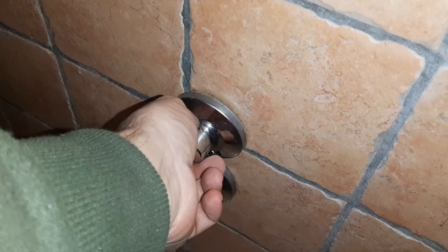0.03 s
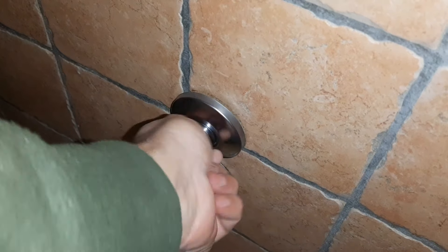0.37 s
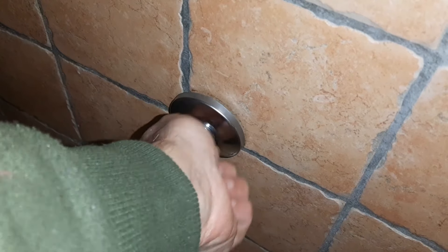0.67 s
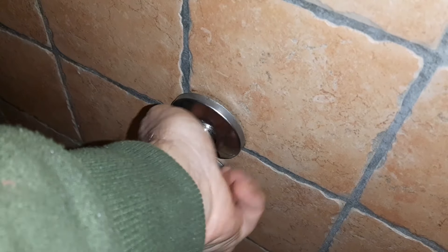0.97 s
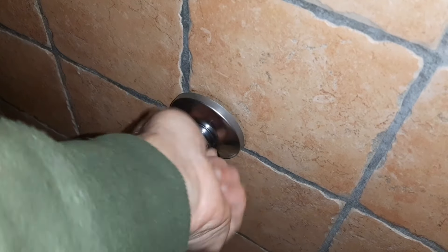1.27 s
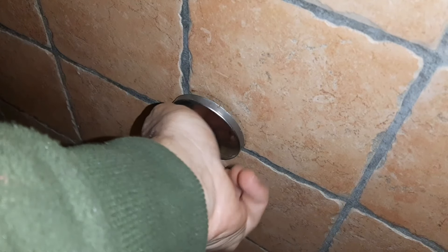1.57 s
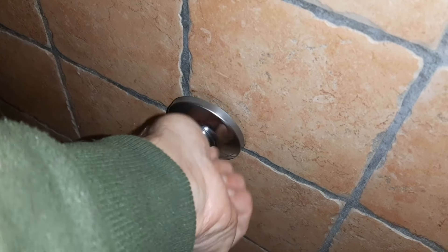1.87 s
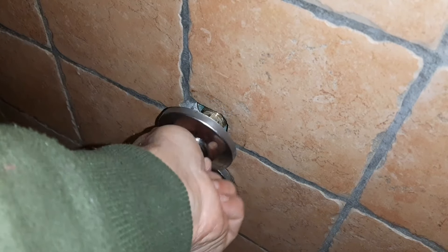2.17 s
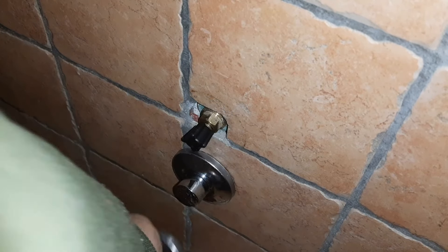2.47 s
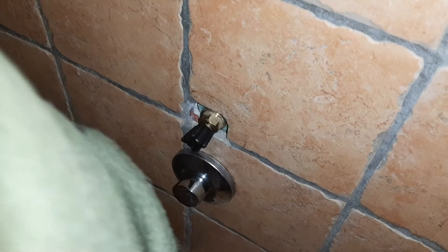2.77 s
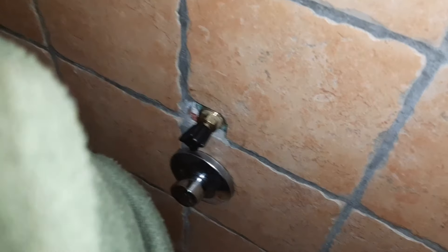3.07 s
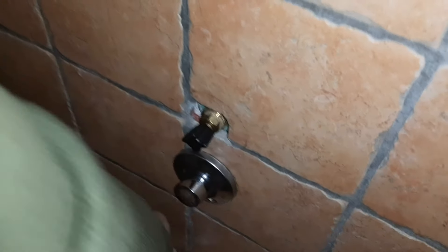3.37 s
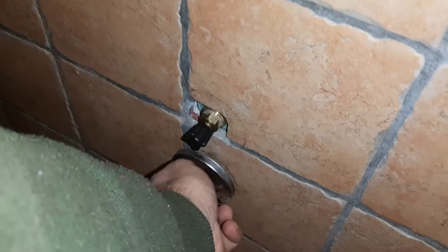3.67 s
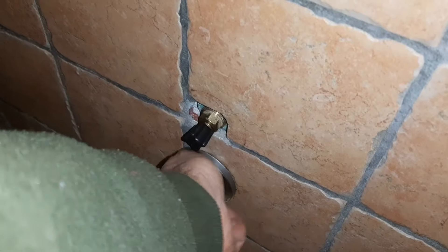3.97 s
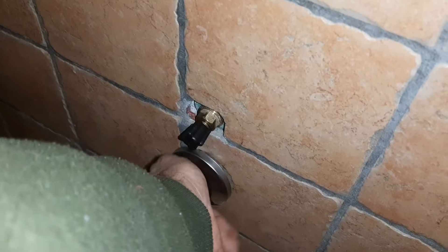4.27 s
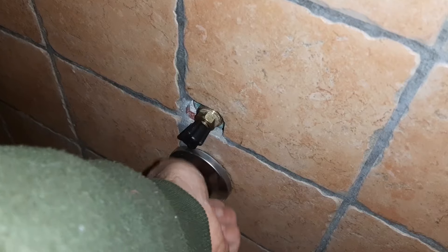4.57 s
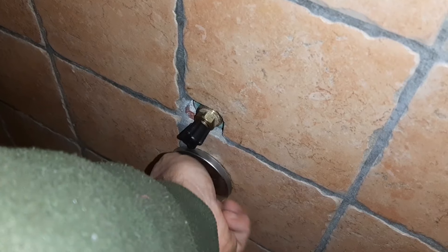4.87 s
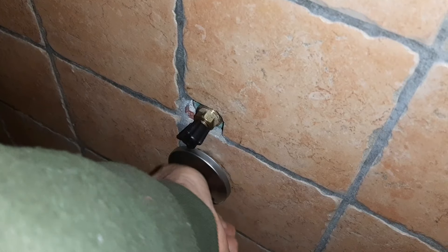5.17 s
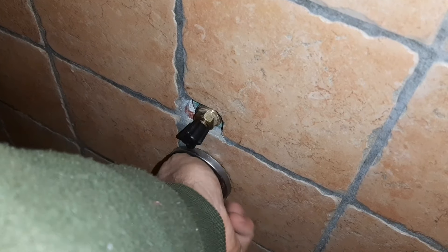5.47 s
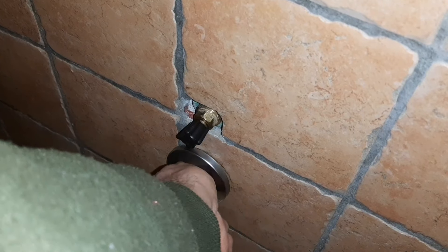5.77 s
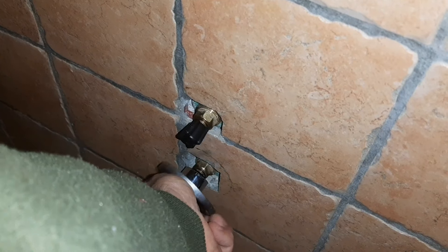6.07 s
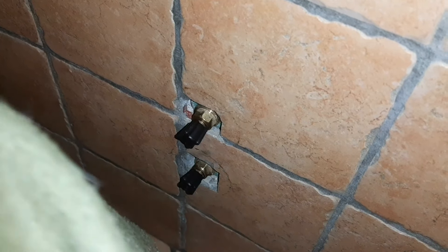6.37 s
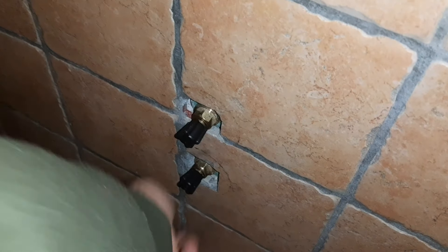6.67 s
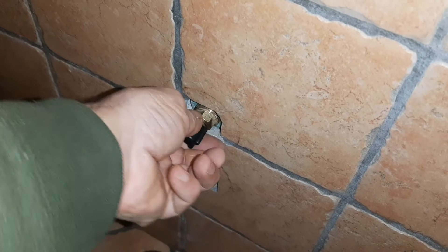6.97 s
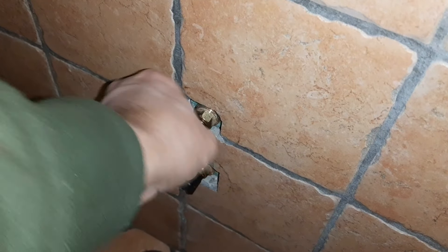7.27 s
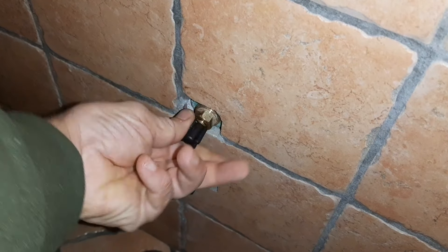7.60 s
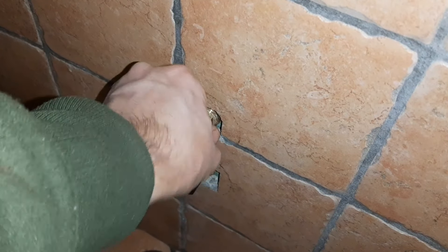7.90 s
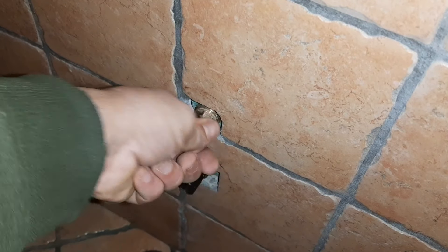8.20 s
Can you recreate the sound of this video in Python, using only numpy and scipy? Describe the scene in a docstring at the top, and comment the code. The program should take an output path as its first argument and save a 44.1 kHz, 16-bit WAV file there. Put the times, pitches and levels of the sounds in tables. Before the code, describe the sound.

Metal valve covers are unscrewed by hand in a tiled bathroom, squeaking and scraping, then set down with a clank and a clatter.

```python
"""A small tiled bathroom, a two-port stereo microphone close to the wall, slightly right of the work.
Two chrome valve covers are unscrewed by hand: their threads stick and slip, ringing the thin metal
and knocking the pipe in the wall. The first squeaks, comes off and is set down with a clank; the
second grinds, rings and lands with a bright clatter. A sleeve rustles, fingers tap the bare valve,
and the tiles answer over faint hiss and house hum."""
import sys
import numpy as np
from scipy import signal
from scipy.fft import rfft, irfft, next_fast_len
from scipy.io import wavfile
from scipy.ndimage import uniform_filter1d, map_coordinates

SR = 44100
rng = np.random.default_rng(int(sys.argv[2]) if len(sys.argv) > 2 else 0)


def log_audio(samples):
    """Write samples as a 16-bit WAV file to the path given in sys.argv[1]."""
    # one column per channel
    frames = np.atleast_2d(samples).T
    # limit to full scale, then quantise
    limited = np.clip(frames, -1, 1)
    pcm = np.round(limited * 32767).astype(np.int16)
    wavfile.write(sys.argv[1], SR, pcm)


N = 372204

# Levels in the tables are relative: each source adds its own gain.
# twists of each cover: start/s, end/s, effort/dB
UPPER_TWISTS = [(0.41, 0.5, -51), (0.56, 0.67, -47.5), (0.84, 0.92, -55.5), (1.045, 1.095, -47.5),
                (1.24, 1.33, -51), (1.48, 1.545, -45.5), (1.65, 1.765, -55.5), (1.87, 1.96, -48),
                (2.065, 2.17, -45), (2.245, 2.3, -45)]
LOWER_TWISTS = [(3.55, 3.602, -45), (3.744, 3.867, -46), (3.998, 4.064, -47), (4.184, 4.295, -41.5),
                (4.373, 4.476, -41.5), (4.509, 4.62, -44.5), (4.747, 4.826, -47), (4.935, 5.064, -43),
                (5.124, 5.174, -40.5), (5.237, 5.434, -45), (5.504, 5.79, -43.5), (5.882, 5.992, -30.5),
                (6.086, 6.117, -41.5), (6.188, 6.205, -31.5)]
# a cover catches on its thread or is nudged in the hand: t/s, level/dB
UPPER_CATCHES = [(0.4896, -27), (0.641, -27), (0.6953, -19), (1.0844, -32), (1.493, -12.5), (1.538, -38),
                 (1.587, -34.5), (1.6632, -38), (1.703, -21.5), (1.749, -27.5), (1.81, -45), (1.872, -33),
                 (1.896, -36), (1.9481, -22.5), (2.0747, -19.5), (2.1031, -21.5), (2.1374, -15)]
LOWER_CATCHES = [(3.5789, -22), (3.7242, -29.5), (4.2005, -18.5), (4.3395, -16), (4.3779, -14.5),
                 (4.442, -26), (4.749, -31), (4.974, -18.5), (5.019, -27.5), (5.1412, -19.5),
                 (5.242, -25.5), (5.2792, -18.5), (5.3245, -26.5), (5.4865, -10), (5.665, -27),
                 (5.7184, -30), (5.7798, -22.5), (5.854, -14), (6.1883, -31.5)]
# resonances of each cover: f/Hz, width/Hz, level held/dB, level let go/dB
UPPER_RESONANCES = [(5160, 50, 3, 1.5), (5340, 70, 7, -5), (5560, 120, 8, -17), (11400, 120, -14, -16),
                    (12140, 130, -4, -7), (13450, 110, -8, -12)]
LOWER_RESONANCES = [(5150, 80, -12, -14), (5700, 70, -3, -14), (6430, 65, 3, 2.5), (6640, 70, -6, -8),
                    (7040, 60, -5, -13), (8620, 70, -20, -27), (10380, 55, -5, -9), (10850, 70, -6, -8),
                    (11250, 90, -2, -9), (12140, 65, -13, -8), (13280, 70, -13, -17), (13650, 80, -9, -14),
                    (14550, 90, -20, -15)]
# the rims slip: t/s, level/dB, half length/s, f/Hz, glide either side of f/octaves
RIM_SLIPS = [(0.385, -40.5, 0.015, 2610, .07), (0.4265, -14.5, 0.0069, 2581, .08),
             (0.592, -42, 0.04, 4190, 0.008), (0.872, -24, 0.0045, 2086, 0.2),
             (0.889, -32, 0.0062, 2490, 0.1), (1.058, -31, 0.0055, 2046, 0.16),
             (1.2615, -16.5, 0.0053, 2382, 0.1), (1.309, -32, 0.0087, 1702, 0.19),
             (1.504, -21, 0.012, 2426, 0.54), (4.039, -28.5, 0.0044, 2114, 0.13),
             (4.341, -31, 0.0026, 1800, .15), (5.388, -31.5, 0.0073, 5270, 0.023),
             (5.618, -26, 0.0025, 5280, 0.02), (6.182, -36.5, 0.0064, 1550, 0.04),
             (6.857, -13.5, 0.0049, 6370, .01), (6.87, -10, 0.0057, 6410, .01)]
# low squeaks carry more overtone and grit: f/Hz, level/dB
SQUEAK_BRIGHTNESS = [(2400, -3), (4300, -32.5)]
# low squeaks are rough, high ones steadier: f/Hz, pitch waver/share
SQUEAK_WAVER = [(2400, .065), (4200, .022)]
# upper cover resonances that rubbing and squeaks excite: f/Hz, width/Hz, level/dB
SQUEAK_MODES = [(5520, 150, 5), (12200, 450, -10.5)]
# the upper cover is set down and rocks: t/s, level/dB, hollow note f/Hz
ROCKING = [(3.2839, -4.5, 1590), (3.2912, -7.5, 1520), (3.3223, -7.5, 1434), (3.3457, -17, 1300),
           (3.3553, -22, 1250), (3.391, -23, 1130), (3.4338, -26, 940), (3.5184, -24.5, 1310),
           (3.543, -33.5, 1312), (3.585, -34.5, 1170), (3.611, -37, 1240)]
# the lower cover lands and rebounds: t/s, level/dB, chatter hold/s, extra treble/dB, floor knock/dB
BOUNCES = [(6.624, -7.5, 0.01, 0.5, -17.5), (6.64, -3, .012, -4.5, -11.5), (6.655, -5, .016, -3, -16.5),
           (6.676, -4.5, 0.006, -6.5, -13.5), (6.696, -9.5, .008, -5, -14), (6.737, -16, .016, 0, -27.5),
           (6.812, -11, 0.0055, -3.5, -21), (6.851, -13, 0.0017, 3, -45.5), (6.8754, -3, .001, 7, -23),
           (6.89, -18, .003, -0.5, -44), (6.907, -14, .004, 1, -48), (6.9427, -15, 0.0039, 0, -44.5),
           (6.988, -16, 0.0052, 2.5, -33.5), (7.026, -8.5, 0.019, 4.5, -33), (7.065, -15, 0.02, 2.5, -58)]
# long ring of the lower cover, on its thread and lying free: f/Hz, level/dB, t60/s
HELD_RING = [(2228, -3.5, 0.25), (3882, -5, 0.3), (5470, -4, .2), (7040, -6, .2)]
FREE_RING = [(2236, -53, 1.8), (3885, -59, 5.0), (3890, -20, .45), (3958, -22, .25)]
# the lower cover sings under a lighter grip: start/s, end/s, low modes/dB, high modes/dB
RING_SWELLS = [(3.815, 3.94, -50, -51.5), (4.23, 4.343, -51, -40.5), (4.436, 4.513, -46.5, -43.5),
               (5.03, 5.1, -47, -51), (5.166, 5.272, -63, -43.5), (5.286, 5.326, -40, -44),
               (5.425, 5.49, -47.5, -46), (5.653, 5.73, -35.5, -40), (5.801, 5.863, -40.5, -41.5),
               (6.0, 6.066, -45.5, -52), (6.2, 6.268, -48.5, -58)]
# hollow bumps, and a low puff of air on the microphone as the cover lands: t/s, level/dB, f/Hz, t60/s
BUMPS_AND_PUFF = [(2.139, -25, 681, 0.12), (2.262, -29.5, 643, 0.13), (3.44, -17, 324, 0.11),
                  (3.441, -26.5, 138, 0.15), (3.453, -26, 193, 0.14), (3.485, -21.5, 275, 0.13),
                  (5.856, -34, 364, 0.12), (6.632, -13.5, 83.44, 0.082), (6.637, -15.5, 334, 0.084),
                  (6.634, -7, 1570, 0.03), (6.7, -11.5, 1400, 0.034)]
# the hand holds a cover: start/s, end/s, pipe rumble/dB
HAND_GRIPS = [(0.42, 2.18, -53), (3.5, 3.8, -54.5), (4.3, 5.45, -54), (5.6, 5.87, -50)]
# hollow resonances of the pipe in the wall: f/Hz, width/Hz, level/dB
PIPE_RESONANCES = [(357, 43, 7.5), (792, 65, 5.5), (1133, 39, -1.5)]
# the pipe knocks as a cover jerks, is grabbed or comes off: t/s, level/dB
PIPE_JOLTS = [(1.497, -34.5), (2.136, -35.5), (5.852, -25), (6.184, -34.5)]
# fingers tap the valve; the loose cover shifts in the hand: t/s, level/dB
FINGER_TAPS = [(7.3687, -50), (7.7715, -51), (8.2381, -53.5)]
HANDLING_TICKS = [(3.0946, -23.5), (3.125, -31.5), (3.153, -36.5), (3.1791, -29.5)]
# the arm sweeps past the microphone: start/s, end/s, level/dB
ARM_SWEEPS = [(0.55, 1.02, -53), (1.05, 1.5, -58.5), (2.22, 2.42, -55.5), (2.49, 2.76, -46.5),
              (2.86, 3.13, -55), (3.4, 3.65, -61), (6.29, 6.5, -51)]
# broad spectra of the sounding bodies and of the room's hiss: f/Hz, level/dB
UPPER_TONE = [(590, -29), (1000, -24.5), (1140, -6.5), (2150, 2.5), (4680, -0.5), (5310, 10), (8450, -14),
              (12100, -21), (16000, -27.5)]
LOWER_TONE = [(590, -52.5), (1000, -20), (2250, 3.5), (2840, -2), (5970, -8), (6470, 6), (8260, -30.5),
              (12700, -32.5), (16000, -46)]
SKITTER_TONE = [(880, -35.5), (1500, -25), (3380, -10), (3840, -6), (4830, -7.5), (6700, 0), (7920, -15.5),
                (9650, -21.5), (11100, -7), (16000, -23)]
PIPE_TONE = [(71, -59), (120, -15.5), (357, 0), (496, -5.5), (779, -9), (957, -21), (1400, -27),
             (1820, -30), (3080, -120)]
KNOCK_TONE = [(120, -43), (200, -10), (333, -4.5), (779, -3), (843, -4), (1360, -1.5), (2090, 1),
              (3000, -7), (3900, -26.5), (6600, -120)]
FLOOR_TONE = [(150, -54.5), (250, -23.5), (389, -14.5), (683, -14), (861, -12), (962, -9), (1430, -1.5),
              (2250, -15.5), (2750, -21.5), (3500, -31), (4550, -54.5), (7700, -91)]
HAND_TONE = [(150, -5.5), (1000, -1), (3000, -4.5), (5000, -3), (8000, -12.5), (16000, -19)]
TICK_TONE = [(150, -58.5), (250, -6.5), (647, 7), (2350, -1.5), (2860, -13), (3170, -44.5), (4000, -30),
             (6500, -120)]
SOFT_TONE = [(71, -36), (120, -6.5), (493, -7), (1460, -12), (4140, -7.5), (8310, -20), (16000, -23)]
HISS_TONE = [(15, -57.5), (25, -28.5), (102, -17), (242, -17.5), (754, -24), (3080, -31), (3820, -22.5),
             (4250, -23.5), (16000, -27.5)]
# spectrum of the house hum: f/Hz, level/dB
HUM_TONE = [(25, -32.5), (45, -20), (75, -6.5), (115, -3.0), (180, -16.0), (500, -58.0)]
# decay of the bathroom: f/Hz, t60/s
ROOM_DECAY = [(150, 1), (1200, 0.45), (5000, 0.37), (14000, 0.22)]
# the right port behind the left, for close sounds and for the bumps and puff: f/Hz, lag/rad
RIGHT_LAG = [(100, .1), (1000, 0.3), (3000, 1.6), (6000, 1.37), (15000, 2.4)]
THUD_LAG = [(100, 1.62), (350, 2.3), (700, 1.06)]

UPPER_LOOSE_S, LOWER_LOOSE_S = 1.82, 5.87  # from here on each cover sits loose on its thread
UPPER_OFF_S, UPPER_OFF_DB = 2.137, -22.5  # the upper cover jumps off with a bright tick
SPLIT_HZ = 4600  # between a cover's low and high resonances
SQUEAK_ROOM_DB = -6  # share of the squeaks that spills into the room
GRIP_EDGE_S = 0.17  # how fast a grip sets in


def upper_cover():
    """The first cover rasps off its thread, damped by the hand, and is set down with a clank."""
    held = body(UPPER_TONE, cover_modes(UPPER_RESONANCES, held=True), broad_db=-7)
    pipe = body(KNOCK_TONE, PIPE_RESONANCES, broad_db=-14.5)
    scrape = turning(UPPER_TWISTS, held, pipe, slips(350, 2.0, 0.86), UPPER_LOOSE_S, rasp_db=4.0,
                     grit_db=-7, knock_db=-9.5, loose_rasp_db=-11, loose_knock_db=11.5, edge=0.0009)
    scrape += contacts(UPPER_CATCHES, held, strike_db=-3.0, knock_db=-20.5, knock_grows=0.56,
                       t60=0.024, knock_t60=0.029, rise=0.00016)
    rub = strokes(UPPER_TWISTS, edge=0.0057) * slips(600, 3, 0.69)
    scrape += amp(-10) * through(rub, body(UPPER_TONE, SQUEAK_MODES, broad_db=-27))
    add(scrape, UPPER_OFF_S, amp(UPPER_OFF_DB) * blow(body(SKITTER_TONE), t60=0.082, rise=0.00035))
    return grip_bend(scrape) + set_down()


def lower_cover():
    """The second cover grinds off with a thin whistle and a swelling ring, then lands and skitters."""
    held = body(LOWER_TONE, cover_modes(LOWER_RESONANCES, held=True), broad_db=-6.0)
    pipe = body(PIPE_TONE, PIPE_RESONANCES, broad_db=3.0)
    scrape = turning(LOWER_TWISTS, held, pipe, slips(300, 2.5, 0.35), LOWER_LOOSE_S, rasp_db=-5.5,
                     grit_db=-2.5, knock_db=-8, loose_rasp_db=-12, loose_knock_db=-16.5, edge=0.008)
    scrape += contacts(LOWER_CATCHES, held, strike_db=-3.0, knock_db=-38.5, knock_grows=0.22,
                       t60=0.052, knock_t60=0.065, rise=0.0018)
    whistles = tiny_squeaks(LOWER_TWISTS, db=4.5, hz=6420, octaves=0.03, half_s=0.0043, per_second=50)
    tight_twists = [row for row in LOWER_TWISTS if row[0] < LOWER_LOOSE_S]
    grit = tiny_squeaks(tight_twists, db=7.5, hz=2730, octaves=0.36, half_s=0.0011, per_second=70)
    held_ring = amp(-22) * through(scrape, unit_energy(shell(HELD_RING)))
    free_ring = np.zeros(N)
    add(free_ring, BOUNCES[0][0] + 0.031, shell(FREE_RING))  # rings once the rim lifts clear
    return grip_bend(scrape) + whistles + grit + landings() + free_ring + swelling_ring() + held_ring


def turning(twists, metal, pipe, force, loose_s, rasp_db, grit_db, knock_db,
            loose_rasp_db, loose_knock_db, edge):
    """Each twist rubs the thread, sounding the cover and knocking the pipe; a loose cover rasps less."""
    rub = force * strokes(twists, edge) * amp(4.5 * wobble(60))  # the grip tightens and eases
    loose = np.arange(N) / SR > loose_s
    low = through(metal, signal.firwin(63, SPLIT_HZ, fs=SR))
    high = through(metal, signal.firwin(63, SPLIT_HZ, fs=SR, pass_zero=False))
    rasp = through(rub * amp(rasp_db + loose_rasp_db * loose), unit_energy(low))
    grit = through(rub * amp(grit_db), unit_energy(high))
    knock = through(rub * amp(knock_db + loose_knock_db * loose), pipe)
    return rasp + grit + knock


def contacts(rows, struck, strike_db, knock_db, knock_grows, t60, knock_t60, rise):
    """Contacts sound a body and knock the wall; the knock grows less, so hard ones are brighter."""
    track, wall = np.zeros(N), body(KNOCK_TONE)
    hardest = max(db for s, db in rows)
    for s, db in rows:
        add(track, s, amp(db + strike_db) * blow(struck, t60, rise))
        add(track, s, amp(knock_db + knock_grows * (db - hardest)) * blow(wall, knock_t60, rise))
    return track


def squeaks():
    """The rim slips: brief fluttering chirps that fall in pitch and shake the metal."""
    track, t = np.zeros(N), np.arange(-SR // 10, SR // 10) / SR
    metal = body(UPPER_TONE, SQUEAK_MODES, broad_db=-26)
    for s, db, half_s, hz, fall in RIM_SLIPS:
        flutter = unit_rms(uniform_filter1d(rng.standard_normal(len(t)), size=60))
        waver = unit_rms(uniform_filter1d(rng.standard_normal(len(t)), size=60))
        pitch_hz = hz * 2 ** (-fall * np.tanh(t / half_s)) * (1 + along(SQUEAK_WAVER, hz) * waver)
        phase = 2 * np.pi * np.cumsum(pitch_hz) / SR
        swell = amp(db) * (1 + 0.22 * flutter) / np.cosh(t / half_s) ** 2
        grit = 2 * amp(-10) * through(swell * rng.standard_normal(len(t)), metal)
        overtone = 0.41 * swell * np.sin(2 * phase)
        bright = amp(along(SQUEAK_BRIGHTNESS, hz)) * (overtone + grit)
        add(track, s + t[0], swell * np.sin(phase) + bright)
    return track


def tiny_squeaks(twists, db, hz, octaves, half_s, per_second):
    """Brief whistles or gritty chirps scattered through each twist, louder with more effort."""
    track, t = np.zeros(N), np.arange(-SR // 25, SR // 25) / SR
    for (start, end, effort_db), draws in zip(twists, rng.standard_normal((len(twists), 40, 4))):
        count = int(np.clip(round((end - start) * per_second), 1, len(draws)))
        for k, (late, detune, glide, strength) in enumerate(draws[:count]):
            pitch_hz = hz * 2 ** (octaves * (detune + 0.513 * glide * np.tanh(t / half_s)))
            swell = amp(effort_db + db + 1.3 * strength) / np.cosh(t / half_s) ** 2
            s = start + (end - start) * (k + .5 + 0.22 * late) / count
            add(track, s + t[0], swell * np.sin(2 * np.pi * np.cumsum(pitch_hz) / SR))
    return track


def set_down():
    """The upper cover clanks, rocks and trembles; its hollow note sinks as it closes on the floor."""
    track = np.zeros(N)
    metal = body(UPPER_TONE, cover_modes(UPPER_RESONANCES, held=False), broad_db=-20.0)
    for s, db, hz in ROCKING:
        hollow = body(FLOOR_TONE, [(hz, 78, 5.5)])
        ring_db = 1.8 * db + 1.0  # soft touches barely ring it
        add(track, s, amp(ring_db) * blow(metal, t60=0.082, rise=.00016))
        add(track, s, amp(db - 0.5) * blow(hollow, t60=0.038, rise=0.00023))
    tremble = body(FLOOR_TONE, [(1140, 300, 7.0), (5270, 60, -9)])
    add(track, 3.35, amp(-30.5) * chatter(tremble, hold=0.05, t60=0.95, rise=0.0055))
    return track


def landings():
    """The lower cover clinks, rattles and knocks the floor at each bounce; edge blows are brighter."""
    track = np.zeros(N)
    for s, db, hold, treble_db, floor_db in BOUNCES:
        lift_db = lambda hz: np.interp(hz, (7000, 7900), [0, treble_db])
        splash = [(hz, level + 1.6 * lift_db(hz)) for hz, level in SKITTER_TONE]
        modes = rim_spot(cover_modes(LOWER_RESONANCES, held=False))
        peaks = [(hz, width, level + lift_db(hz)) for hz, width, level in modes]
        metal = body(splash, peaks, broad_db=-11.5)
        add(track, s, amp(db - 0.5) * blow(metal, t60=0.017, rise=.003))
        add(track, s, amp(db + 0.5) * chatter(metal, hold, t60=.07, rise=0.0048))
        add(track, s, amp(floor_db) * chatter(body(KNOCK_TONE), hold, t60=0.059, rise=0.00067))
    return track


def swelling_ring():
    """Where the fingers ease off, the rubbed shell sings; each mode swells and fades in its own way."""
    track, t = np.zeros(N), np.arange(N) / SR
    low = strokes([(start, end, db) for start, end, db, _ in RING_SWELLS], edge=.028)
    high = strokes([(start, end, db) for start, end, _, db in RING_SWELLS], edge=.028)
    for hz, db, _ in HELD_RING:
        swell = (low if hz < SPLIT_HZ else high) * amp(db + 4.4 * wobble(28))
        track += swell * np.sin(2 * np.pi * hz * t + 1.2 * wobble(55))
    return track


def shell(modes):
    """The lingering ring of a thin chrome shell: a few decaying sines."""
    t = np.arange(2 * SR) / SR
    return sum(amp(db - 60 * t / t60) * np.sin(2 * np.pi * hz * t) for hz, db, t60 in modes)


def cover_modes(modes, held):
    """Resonances of a cover held in the hand or let go: f/Hz, width/Hz, level/dB."""
    return [(hz, width, held_db if held else free_db) for hz, width, held_db, free_db in modes]


def rim_spot(modes, detune=.004, spread_db=3):
    """Each spot on the rim sounds the modes in a different mix and detunes them slightly."""
    return [(hz * (1 + detune * rng.standard_normal()), width, db + spread_db * rng.standard_normal())
            for hz, width, db in modes]


def grip_bend(x, depth_s=.00018, per_second=22):
    """The shifting grip bends the resonances slightly in pitch, by way of a wandering delay."""
    return map_coordinates(x, [np.arange(N) + SR * depth_s * wobble(per_second)], order=3)


def slips(per_second, spread_db, smooth, size=N):
    """Stick-slip force: tiny jerks of uneven size over smooth sliding noise."""
    jerks = (rng.random(size) < per_second / SR) * rng.choice([-1, 1], size)
    strength = amp(spread_db * np.clip(rng.standard_normal(size), -2, 2))
    return unit_rms(unit_rms(jerks * strength) + smooth * rng.standard_normal(size))


def blow(response, t60, rise):
    """One contact of peak 1: micro-bounces build up and die away, played through a body."""
    t = np.arange(SR // 6) / SR
    force = rng.standard_normal(len(t)) * amp(-60 * t / t60) * (1 - np.exp(-t / rise))
    sound = through(force, response)
    return sound / np.abs(sound).max()


def chatter(response, hold, t60, rise):
    """A rim rattles on the floor in tiny collisions for hold seconds, then dies away; peak 1."""
    t = np.arange(SR // 3) / SR
    swell = amp(-60 * np.maximum(t - hold, 0) / t60) * (1 - np.exp(-t / rise))
    force = slips(900, 1.8, .45, size=len(t)) * amp(2.5 * wobble(180, size=len(t)))
    sound = through(force * swell, response)
    return sound / np.abs(sound).max()


def body(spectrum, peaks=(), broad_db=0, size=8192):
    """A body's impulse response, energy 1: resonances standing on a broad spectrum."""
    hz = np.fft.rfftfreq(size, 1 / SR)
    power = amp(along(spectrum, hz) + broad_db) ** 2
    for centre, width, db in peaks:
        power += (amp(db) * hz * width) ** 2 / ((centre ** 2 - hz ** 2) ** 2 + (hz * width) ** 2)
    # minimum phase: nothing rings before it is struck
    cepstrum = irfft(np.log(power + 1e-12) / 2)
    cepstrum[1:size // 2] *= 2
    cepstrum[size // 2 + 1:] = 0
    return unit_energy(irfft(np.exp(rfft(cepstrum))))


def bumps_and_puff():
    """Hollow bumps, and a low puff of air on the microphone as the cover lands; the ports out of step."""
    ports, t = np.zeros((2, N)), np.arange(SR // 3) / SR
    for s, db, hz, t60 in BUMPS_AND_PUFF:
        swell = amp(db - 60 * t / t60) * (1 - np.exp(-t / .005))
        add(ports[0], s, swell * np.sin(2 * np.pi * hz * t))
        add(ports[1], s, amp(-3.0) * swell * np.sin(2 * np.pi * hz * t - along(THUD_LAG, hz)))
    return ports


def gripped_pipe():
    """The turning hand makes the pipe rumble and knock in the wall."""
    pipe = body(PIPE_TONE, PIPE_RESONANCES, broad_db=12.5)
    track = through(strokes(HAND_GRIPS, GRIP_EDGE_S) * slips(300, 4.4, 0.55), pipe)
    for s, db in PIPE_JOLTS:
        add(track, s, amp(db) * blow(pipe, t60=0.12, rise=0.01))
    return track


def fingers():
    """Fingertips tap the bare valve softly; the loose cover ticks as it shifts in the hand."""
    track = contacts(FINGER_TAPS, body(SOFT_TONE), strike_db=3.0, knock_db=-80, knock_grows=.6,
                     t60=0.039, knock_t60=0.024, rise=.0005)
    for s, db in HANDLING_TICKS:
        add(track, s, amp(db) * blow(body(HAND_TONE), t60=0.015, rise=0.00027))
    return track


def dull_ticks(starts_s=(0.114, 7.539), gap_s=0.098):
    """Runs of four faint dull ticks, each tick weaker than the last."""
    track, tick = np.zeros(N), body(TICK_TONE)
    for s in starts_s:
        for k in range(4):
            db = -40.5 - 4 * np.log2(k + 1)
            add(track, s + k * gap_s, amp(db) * blow(tick, t60=0.0045, rise=0.00026))
    return track


def sleeve():
    """Fleece brushes past with each sweep and stirs while the hand grips, nearer the left port."""
    motion = strokes(ARM_SWEEPS, edge=0.071) + amp(-14.5) * strokes(HAND_GRIPS, GRIP_EDGE_S)
    motion *= amp(0.4 * wobble(57))
    rustle = np.array([through(motion * slips(1300, 1.6, 0.93), body(SOFT_TONE)) for _ in range(2)])
    return rustle * amp([[3], [-1]])


def tiles(x, early_db, early_t60, tail_db, size=8192):
    """Direct sound, near tiles and room tail at one port; reflections change as the arm moves."""
    t, wet = np.arange(2 * size) / SR, np.zeros(N)
    for start in range(0, N, size // 2):  # a fresh echo for each overlapping piece
        hz, age, noise = signal.stft(rng.standard_normal(len(t)), SR, nperseg=256)
        decay = amp(-60 * age / along(ROOM_DECAY, hz)[:, None])
        tail = signal.istft(noise * decay, SR, nperseg=256)[1][:len(t)]
        tail *= 1 - np.exp(-t / .008)
        early = rng.standard_normal(len(t)) * amp(-60 * t / early_t60) * (t > .0005)
        echo = amp(early_db) * unit_energy(early) + amp(tail_db) * unit_energy(tail)
        piece = x[start:start + size]
        window = np.sqrt(np.hanning(size))[:len(piece)]
        add(wet, start / SR, signal.fftconvolve(piece * window, echo))
    return x + wet


def room_tone():
    """Faint hiss and a low hum of the house; the hum dips after the clatter."""
    hiss = np.array([through(rng.standard_normal(N), body(HISS_TONE)) for _ in range(2)])
    hum = through(rng.standard_normal(N), body(HUM_TONE))
    dip = 1 - strokes([(7.0, 7.87, -2.3)], edge=0.16)
    return amp(-68.5) * hiss + amp(-67.5) * dip * hum


def two_ports(source, width):
    """Contacts all round a rim reach the ports in different mixes: one draw mid, another side."""
    mid, side = source(), source()
    return np.cos(width) * mid + np.sin(width) * side * np.array([[1], [-1]])


def lagged(x):
    """Delay each frequency by its lag at the right port."""
    size = next_fast_len(N + SR // 2)
    lag = along(RIGHT_LAG, np.fft.rfftfreq(size, 1 / SR))
    return irfft(rfft(x, size) * np.exp(-1j * lag), size)[:N]


def strokes(rows, edge):
    """Gain of movements (start/s, end/s, level/dB): each sets in, holds and lets go."""
    gain, t = np.zeros(N), np.arange(N) / SR
    for start, end, db in rows:
        corners_s = [start - edge, start + edge, max(end - edge, start + edge), end + 2 * edge]
        gain += amp(db) * np.interp(t, corners_s, [0, 1, 1, 0])
    return gain


def wobble(rate, size=N):
    """A wandering random curve, rate knots a second."""
    knots = rng.standard_normal(int(size * rate / SR) + 4)
    return np.interp(np.arange(size) * rate / SR, np.arange(len(knots)), knots)


def amp(db):
    """Decibels to gain."""
    return 10 ** (np.asarray(db) / 20)


def unit_rms(x):
    """Scale to rms 1."""
    return x / np.sqrt(np.mean(x ** 2) + 1e-20)


def unit_energy(x):
    """Scale to energy 1."""
    return x / np.linalg.norm(x)


def along(points, hz):
    """Read a curve of (f/Hz, value) points on a log frequency axis."""
    freqs, values = np.transpose(points)
    return np.interp(np.log(hz + 1), np.log(freqs + 1), values)


def add(track, s, sound):
    """Mix a sound in at time s."""
    part = track[max(round(s * SR), 0):][:len(sound)]
    part += sound[:len(part)]


def through(x, response):
    """Play x through an impulse response."""
    return signal.fftconvolve(x, response)[:len(x)]


def scene():
    """Covers close and a little left, so the right port lags; squeaks beam at the microphone, drier."""
    covers = two_ports(upper_cover, width=0.13) + two_ports(lower_cover, width=0.32)
    pipe = two_ports(gripped_pipe, width=0.075)
    chirps = squeaks()
    left, right = covers + pipe + amp(SQUEAK_ROOM_DB) * chirps + fingers() + dull_ticks()
    room = np.array([tiles(port, early_db=-5.5, early_t60=0.045, tail_db=-9.0)
                     for port in (left, lagged(right))])
    beam = (1 - amp(SQUEAK_ROOM_DB)) * np.array([chirps, lagged(chirps)])
    return amp(-0.5) * room + beam + bumps_and_puff() + sleeve() + room_tone()


def record(dry):
    """The recorder keeps nothing above 16 kHz."""
    size = next_fast_len(N + SR // 2)
    passband = np.fft.rfftfreq(size, 1 / SR) < 16000
    return irfft(rfft(dry, size) * passband, size)[:, :N]


dry = scene()
out = record(dry)
log_audio(out)
```